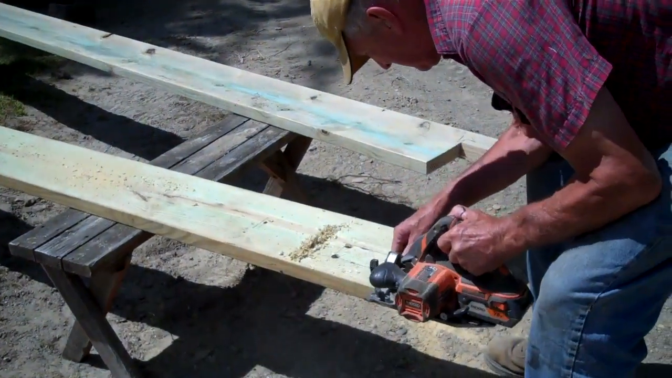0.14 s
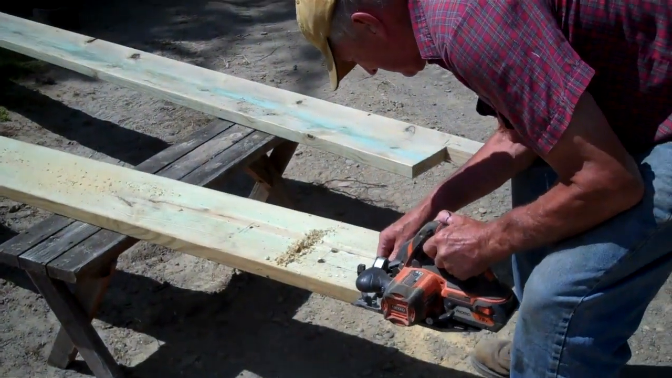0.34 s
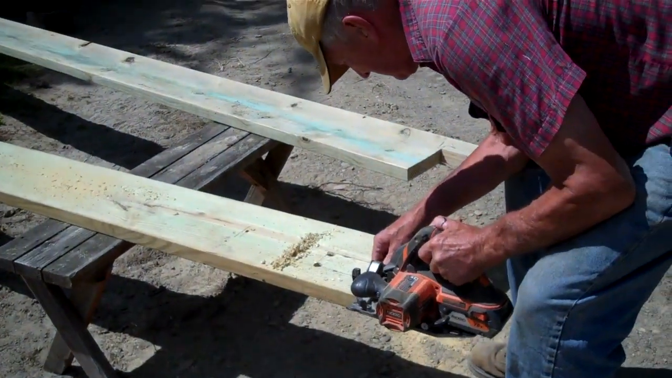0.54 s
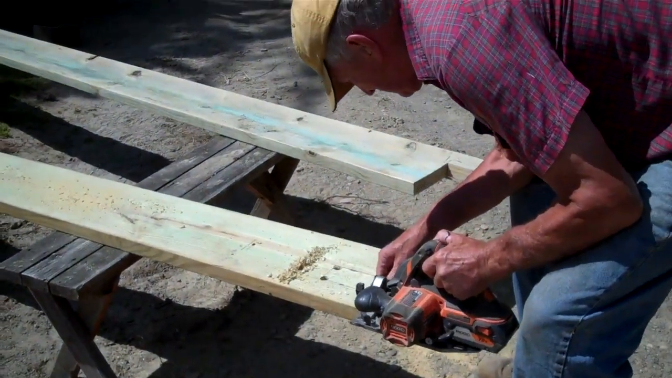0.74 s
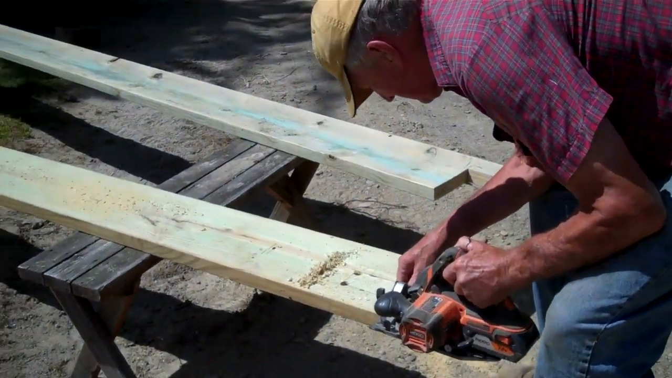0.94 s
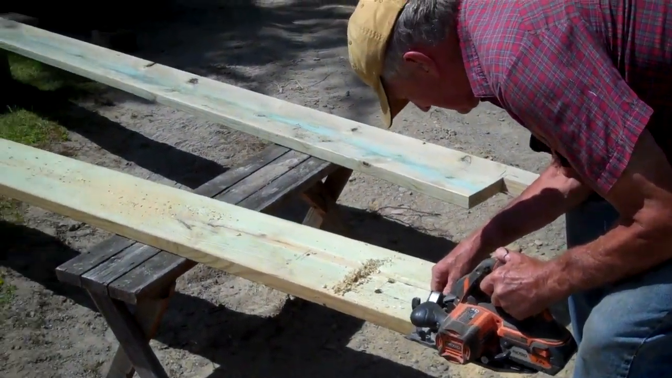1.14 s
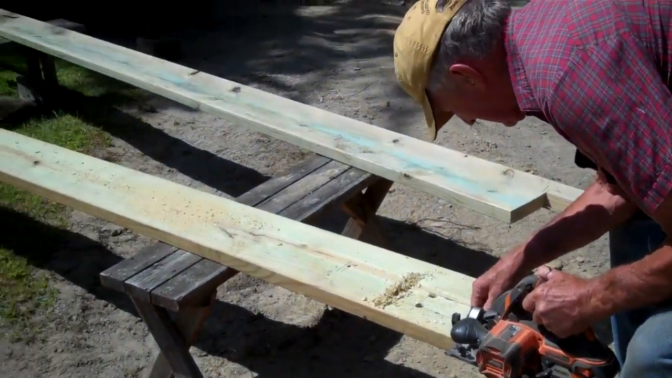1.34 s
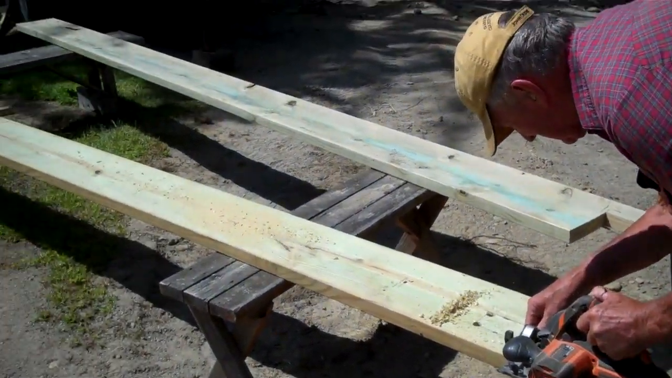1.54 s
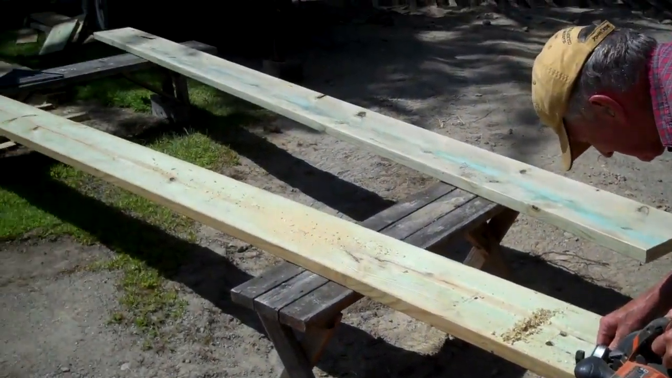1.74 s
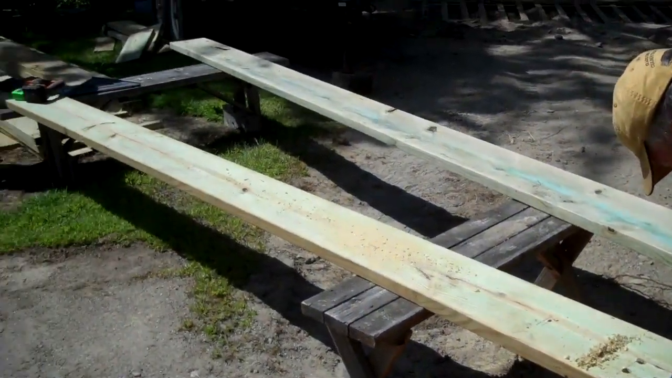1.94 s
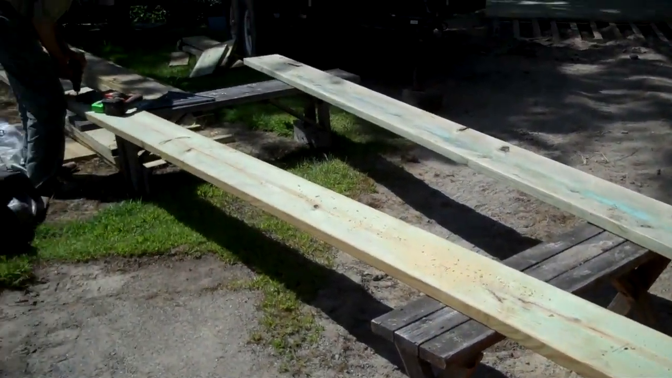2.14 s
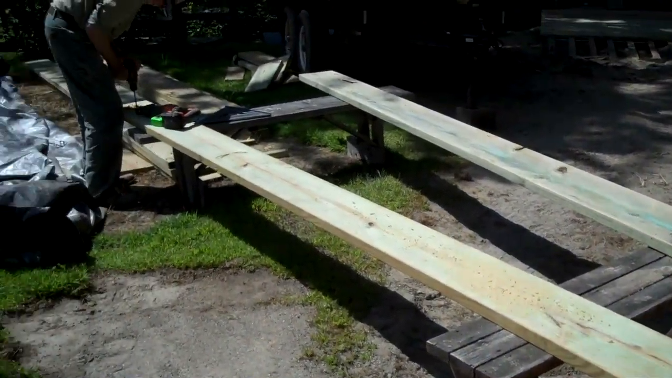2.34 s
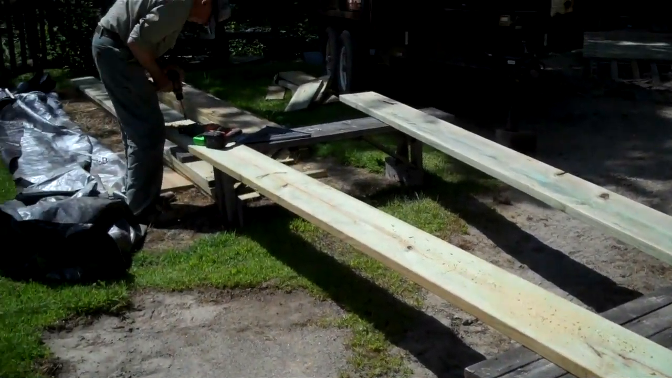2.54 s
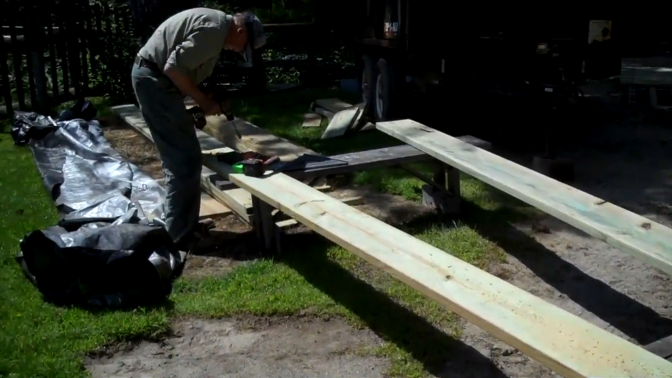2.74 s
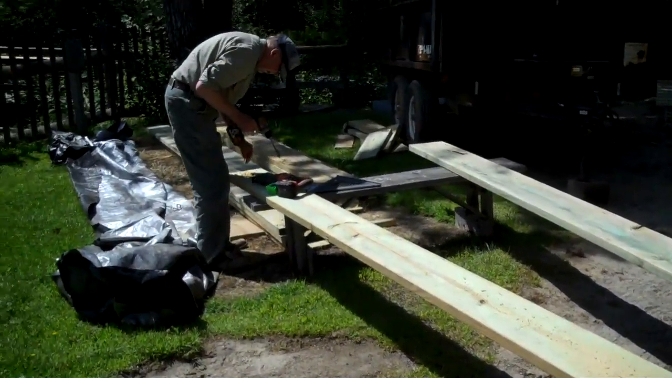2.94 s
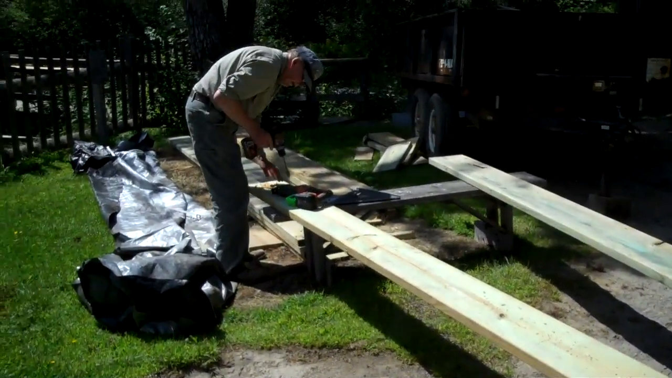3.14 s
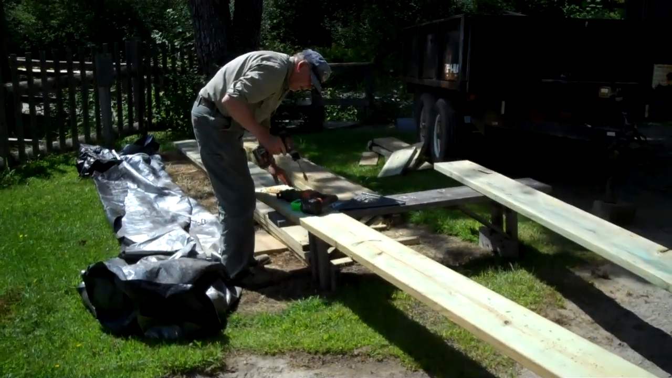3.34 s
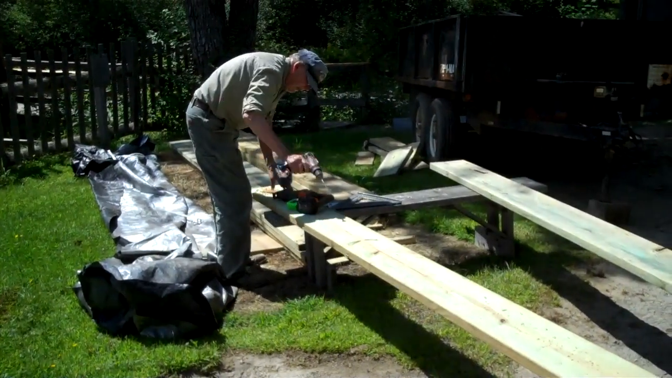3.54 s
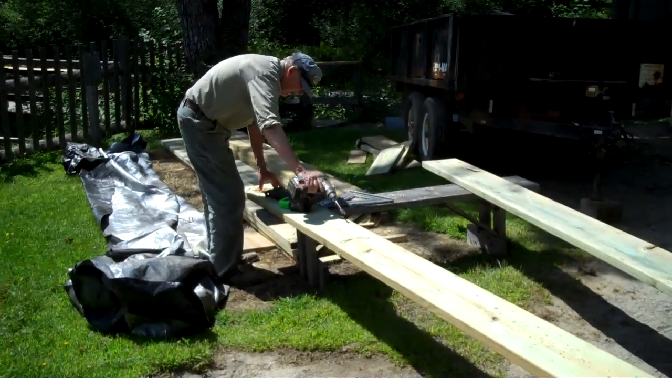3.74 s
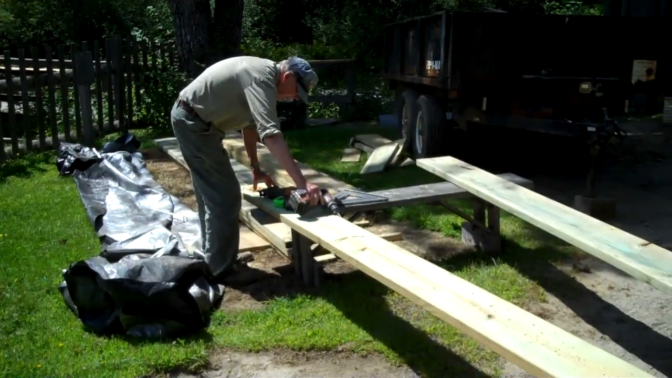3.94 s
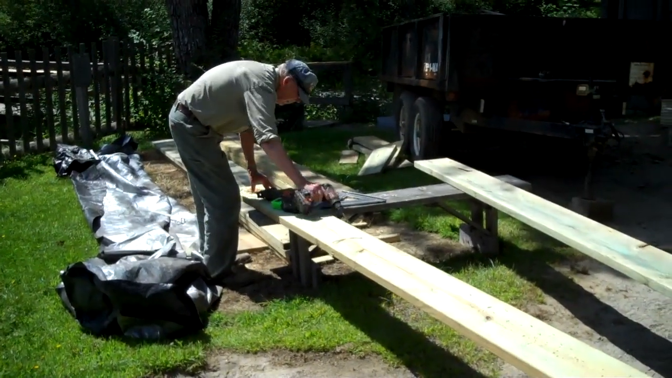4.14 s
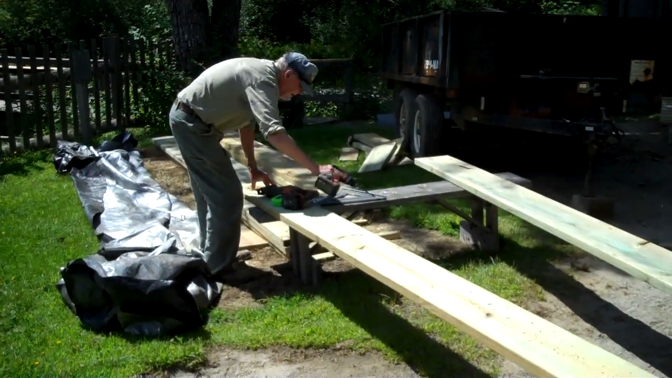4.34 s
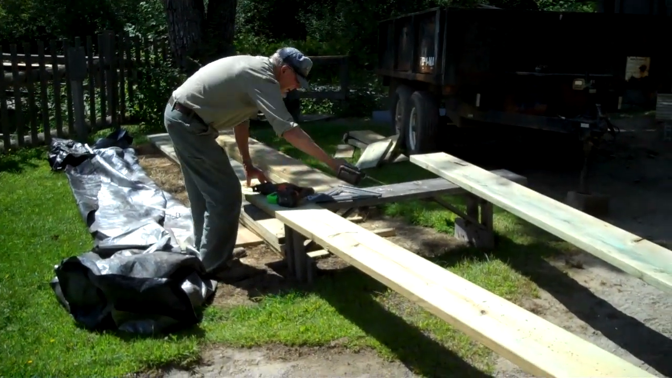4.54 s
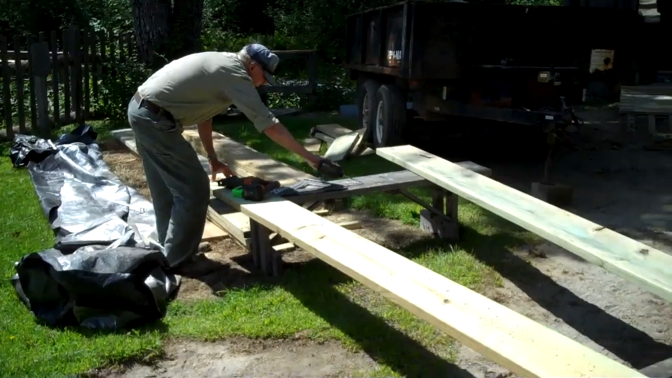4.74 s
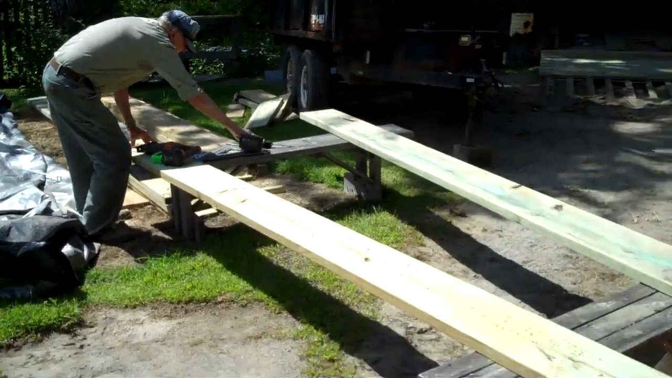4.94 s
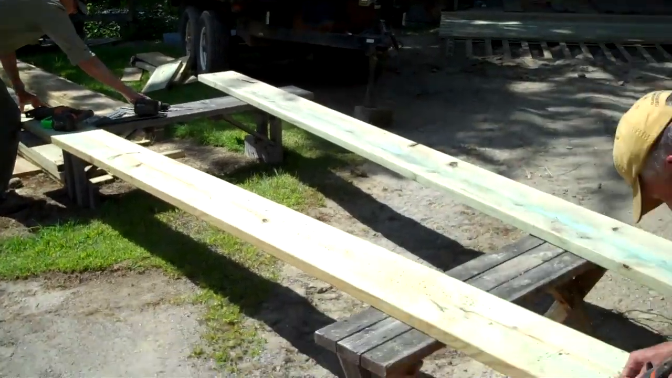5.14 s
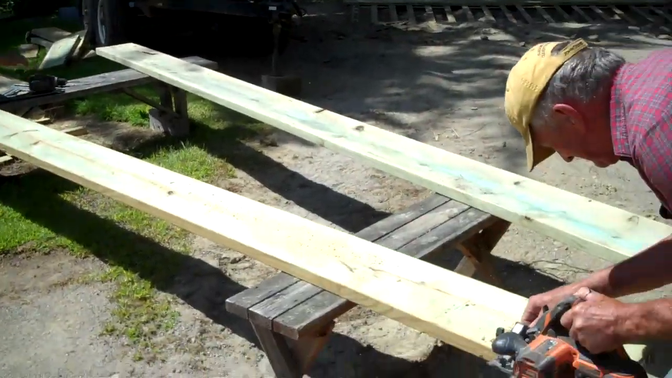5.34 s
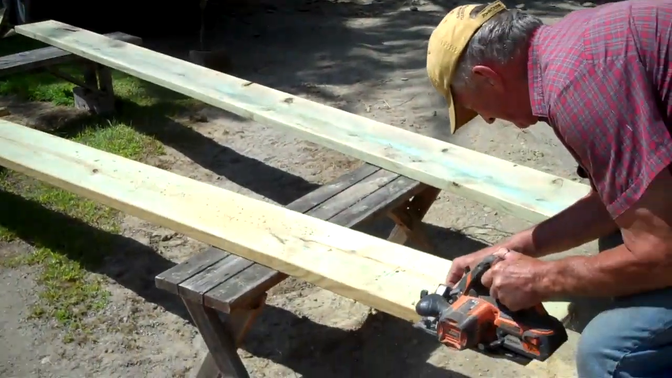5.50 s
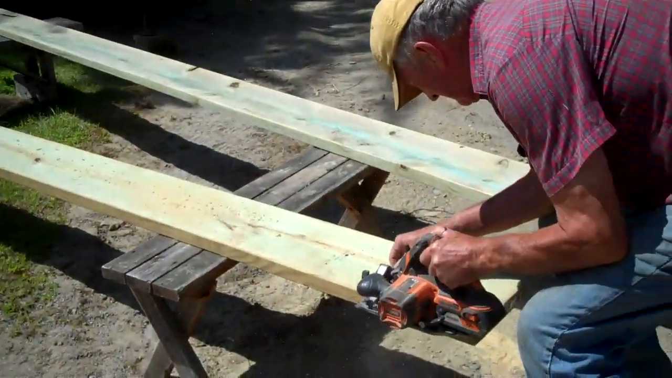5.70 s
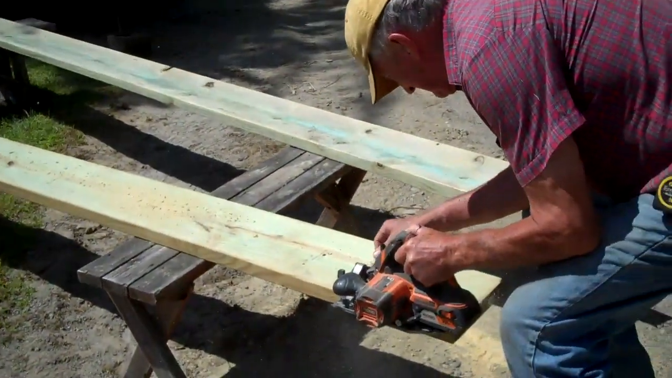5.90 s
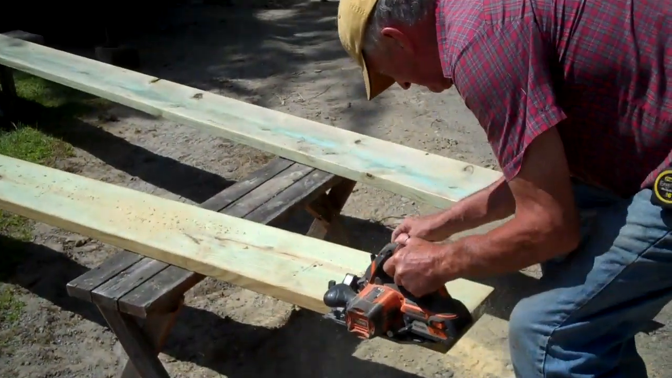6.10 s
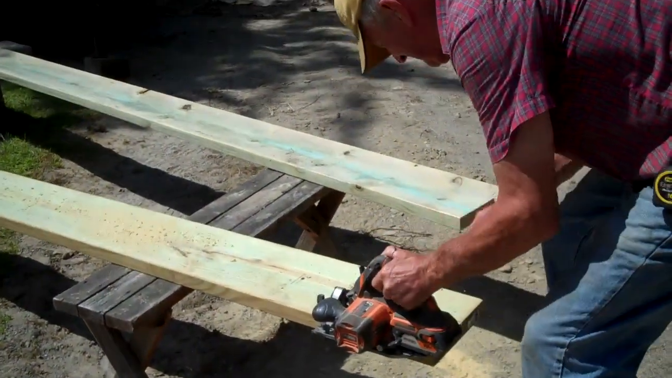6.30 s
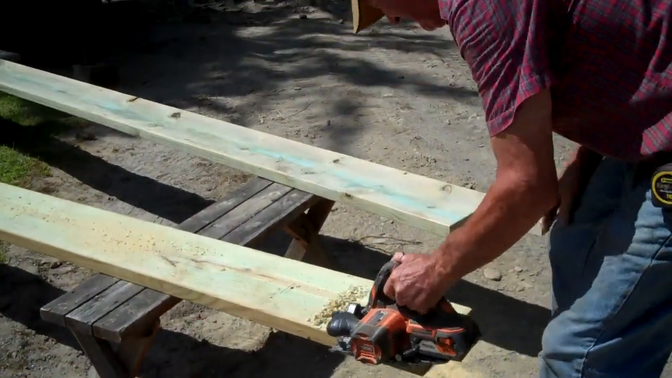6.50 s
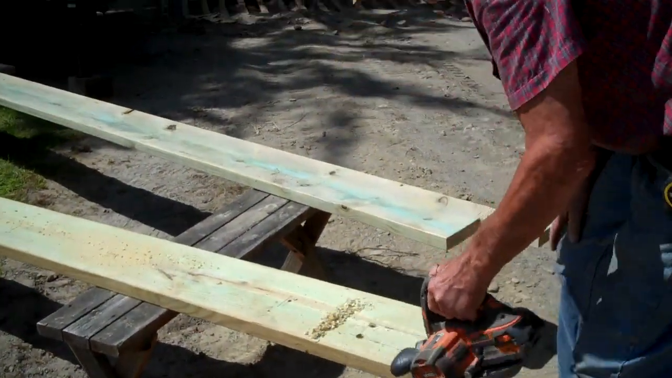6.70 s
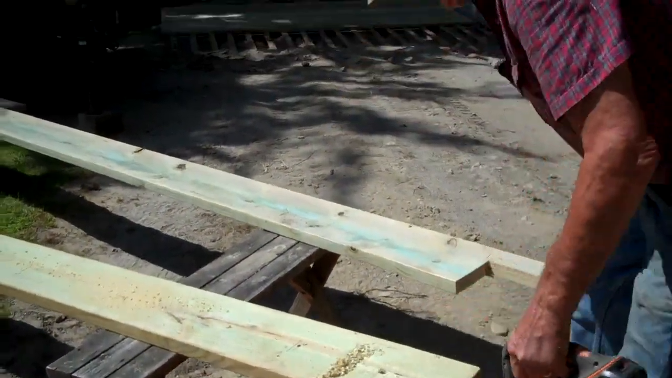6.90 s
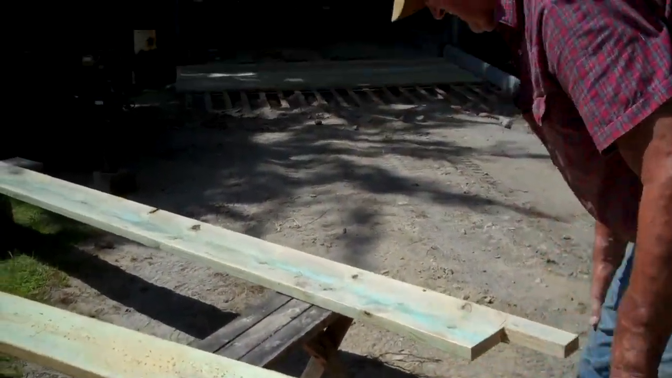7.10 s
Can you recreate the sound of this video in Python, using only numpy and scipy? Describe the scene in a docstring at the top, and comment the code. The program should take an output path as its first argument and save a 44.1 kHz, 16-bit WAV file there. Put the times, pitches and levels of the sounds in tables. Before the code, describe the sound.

A cordless planer snaps on and shaves a board with a hissing, rasping cut and whine, then stops, while another tool hisses farther off.

```python
"""In a yard, a power tool works a plank some way off to the left. Close on the right a cordless planer
snaps on, spins up and shaves a board. Its knives hiss and rasp as they tear off chips, its fan and belt
whine sink as the load grows and rise as it eases, and its sole (the metal base) squeals as it rubs.
It is lifted and stops, then the sole slides off the end of the board."""
import sys
import numpy as np
from scipy import signal
from scipy.fft import rfft, irfft
from scipy.io import wavfile
from scipy.ndimage import uniform_filter1d, map_coordinates

SR = 44100
rng = np.random.default_rng(int(sys.argv[2]) if len(sys.argv) > 2 else 0)


def dump(signal):
    """Clip the signal to [-1, 1] and save it as 16-bit WAV at the path in sys.argv[1]."""
    limited = np.clip(np.atleast_2d(signal).T, -1, 1)
    pcm = np.round(limited * 32767).astype(np.int16)
    wavfile.write(sys.argv[1], SR, pcm)


N = 315756
T = np.arange(N) / SR
HZ = np.maximum(np.arange(N // 2 + 1) * SR / N, 1)

# how loud the cut is: t/s, level/dB, extra for the hiss/dB, extra for the chip spray/dB
CUT_LEVELS = [(1.8, -24.5, 3.5, -9), (2.45, -23.5, 1, -11.5), (2.8, -22, 2.5, -5), (3.4, -24, 5.5, 1.5),
              (4.55, -24.5, 2, 1), (4.85, -26, 4.5, 5), (5.15, -22, 6, -5), (5.6, -25, 6.5, -3),
              (5.9, -26, 9, -2.5), (6.12, -26, 4.5, -18), (6.3, -31, 8, -7)]
# moments when the knives bite deeper: t/s, length/s, boost/dB
DEEP_BITES = [(1.46, 0.037, 7), (1.61, 0.16, 2.5), (1.73, 0.089, 7.5), (2.06, 0.16, 4.5), (2.19, 0.082, 3),
              (2.36, 0.065, 5), (2.63, 0.18, 5.5), (5.77, 0.063, 2), (6.02, 0.065, 7.5), (6.18, 0.061, 8.5)]
# tone colours of the cut's four layers, from low to high: f/Hz, level/dB
BOARD_COLOUR = [(30, -40), (90, -33.5), (200, -20), (380, -11), (520, 8), (660, 12.5), (780, 5), (1050, 12),
                (1350, 6), (1700, -45)]
RASP_COLOUR = [(1100, -82), (1400, 1.5), (1600, -1), (1900, -0.5), (2400, 4), (2850, 5), (3400, 0.5),
               (4000, 0), (4650, 4.5), (5500, -10.5)]
HISS_COLOUR = [(4000, -66), (4750, -4), (5300, 3.5), (5800, 3.5), (6300, 7.5), (6900, 7.5), (7400, 9.5),
               (8000, 3), (8700, -1.5), (10000, -85)]
SPRAY_COLOUR = [(7800, -32), (8900, 0), (10000, -10), (11500, -10.5), (12800, -14.5), (14300, -13)]
# how each of those layers reacts: share of a bite, exponent on the spin, share of the flutter
LAYER_RESPONSE = [(0.38, 0.1, .5), (0.85, 1.0, 0.25), (1.0, 4.3, 0.56), (1, 3.8, 1)]
# how alike a tool's noise is on the left and right: f/Hz, likeness (1 = the same)
TOOL_LIKENESS = [(60, 0.34), (300, 0.87), (1200, 1), (3500, 0.95), (6500, 0.85), (9000, 0.53),
                 (13000, 0.11)]
def knives(speed, chip_db=1.3, pulse_depth=.25, grain_db=1.5, flutter_db=1.64, lift_s=6.3):
    """Each knife pass tears a chip of its own size; deep bites swell the cut, the grain flutters it."""
    turns = np.cumsum(speed) / SR
    chip_size = rng.standard_normal(N)[turns.astype(int)]
    passes = from_db(chip_db * chip_size) * (1 + pulse_depth * np.cos(2 * np.pi * turns))
    feed_db, hiss_db, spray_db = in_time(CUT_LEVELS)
    feed_db = feed_db - 188 * np.maximum(T - lift_s, 0)   # the cut dies as the planer is lifted
    board_db = -14 + .0885 * (in_time(SHAFT_SPEED)[0] - 200)   # the board drums harder at speed
    bite_db, spun, flutter, out = swells(DEEP_BITES), spin(), drift(32), 0
    layers = (board_db, BOARD_COLOUR), (0, RASP_COLOUR), (hiss_db, HISS_COLOUR), (spray_db, SPRAY_COLOUR)
    for (layer_db, colour), (bite_share, exponent, flutter_share) in zip(layers, LAYER_RESPONSE):
        tearing = rms_one(passes * from_db(grain_db * drift(910)))
        wander_db = flutter_db * (flutter_share * flutter + .5 * drift(7.9))
        gain = spun ** exponent * from_db(feed_db + layer_db + bite_share * bite_db + wander_db)
        out = out + gain * tearing * noise(colour, TOOL_LIKENESS)
    bass_cut = signal.butter(2, 190, "high", fs=SR, output="sos")
    return signal.sosfilt(bass_cut, out)   # keeps deep rumble out of the cutting noise


# how fast the load lets the planer's shaft turn: t/s, speed/(turns per s)
SHAFT_SPEED = [(1.9, 255), (2.12, 251), (2.42, 275), (2.57, 280), (2.98, 266), (3.25, 241), (3.53, 206),
               (3.7, 197.5), (3.9, 209.5), (4.07, 198.5), (4.3, 203.5), (4.6, 198), (5.15, 167), (5.3, 164),
               (5.58, 163.5), (5.75, 182), (5.92, 190), (6.05, 220), (6.23, 245)]
def shaft_speed(wobble=.00227):
    """Turns per second, from start to stop: the shaft slows under load and wobbles a little."""
    return in_time(SHAFT_SPEED)[0] * spin() * (1 + wobble * drift(52.4))


SWITCH_ON_S, SWITCH_OFF_S = 1.355, 6.24
def spin(spin_up_s=.28, braking_s=.21):
    """Share of working speed, 0 to 1: the shaft speeds up at nearly steady power and brakes evenly."""
    rising = np.clip((T - SWITCH_ON_S) / spin_up_s, 0, 1) ** .42
    return rising * np.clip(1 - (T - SWITCH_OFF_S) / braking_s, 0, 1)


# tones of the motor, cutter and six-bladed fan: multiple of the shaft speed, level/dB
MOTOR_TONES = [(3, -13), (3.5, -15), (4, -15), (4.5, -16), (5, -19), (5.5, -19), (6, -4.5), (7, -9),
               (8, -10), (9, -10), (10, -10), (11, -11), (12, -10)]
# the low hum, the whistle and the high singing: multiple of the shaft speed, level/dB
HUM_TONES = [(1, -21), (1.25, -19), (1.5, -19), (2, -24)]
WHISTLE_TONES = [(18.5, -5.5), (27.75, -3), (30, 1), (36.25, -8)]
SINGING_TONES = [(12, -7), (15, -8), (30, 0)]
# pitches at which the planer's case rings and lifts a tone: f/Hz, width/Hz, boost/dB
CASE_RINGS = [(264.6, 37, 10.5), (610, 23, 5), (1020, 510, 8), (1220, 120, 2), (4400, 530, 2.5),
              (5260, 1900, 17), (6330, 670, 7.5)]
# brief swells and dips of the motor's drone: t/s, length/s, change/dB
DRONE_SWELLS = [(2.2, 0.34, -8), (3.55, 0.21, 1), (5.42, 0.19, -9), (5.72, 0.1, 1.5), (6.05, 0.46, -2.5)]
def motor(speed):
    """Motor and fan drone, whistle under the first light load and sing when they turn fastest."""
    running = spin() ** 4
    drone_gain = running * from_db(-38 + swells(DRONE_SWELLS))
    drone = drone_gain * tones(speed, MOTOR_TONES, waver_db=2.8, rings=CASE_RINGS)
    hum_gain = running * held(SWITCH_ON_S, 5.54, fade_s=.6) * from_db(-42)
    hum = hum_gain * tones(speed, HUM_TONES, waver_db=2, rings=CASE_RINGS)   # the shaft is unbalanced
    shaky_speed = speed * (1 + .007 * drift(160))
    whistle_gain = held(1.6, 2.12, fade_s=.05) * from_db(-23.5)
    whistle = whistle_gain * tones(shaky_speed, WHISTLE_TONES, waver_db=2.8)
    singing_gain = running * from_db(-25.5 - .3 * (270 - speed))   # fades as the shaft slows
    singing = singing_gain * tones(shaky_speed, SINGING_TONES, waver_db=2.8)
    return drone + hum + whistle + singing


# tones of the toothed belt: multiple of the rate at which teeth pass, level/dB
BELT_TONES = [(2, -10), (3, -15), (4, -15), (5, -22)]
# brief swells and dips of its whine: t/s, length/s, change/dB
WHINE_SWELLS = [(3.9, 0.18, 5.5), (4.98, 0.25, -6), (5.47, 0.43, 4), (5.82, 0.26, -6), (6.15, 0.043, 9),
                (6.25, .08, -8)]
def belt(speed, teeth_per_turn=10.75, slack_speed=254):
    """The belt slips and screeches at the start, whines when pulled tight and flaps as speed changes."""
    smooth_speed = uniform_filter1d(speed, SR // 10)
    surge = np.clip(abs(np.gradient(smooth_speed)) * SR / 500, 0, 1)   # how quickly the speed changes
    tooth_hz = speed * teeth_per_turn * (1 + (.002 + .026 * surge) * drift(400))
    roughness = np.clip(.26 + .91 * surge, 0, .6)
    flapping = np.sqrt(1 - roughness ** 2) + roughness * drift(570)
    tension = spin() ** 4 * np.clip((slack_speed - speed) / 50, 0, 1)   # grows as load slows the shaft
    whine_gain = tension * from_db(-28 + swells(WHINE_SWELLS))
    screech_gain = held(1.4, 1.615, fade_s=.066) * from_db(-21.5)
    teeth = tones(tooth_hz, BELT_TONES, waver_db=1.6, rings=CASE_RINGS)
    return np.maximum(whine_gain, screech_gain) * flapping * teeth


# the stopped planer slides off the board and drops: t/s, rise/s, fall/s, board/dB, rasp/dB, hiss/dB
SOLE_SLIDES = [(6.72, 0.059, 0.061, -42, -34, -34), (6.787, 0.014, 0.017, -29, -36, -39)]
def sole_slide(judder_db=2.5):
    """The sole judders over the wood, which sounds with the tone colours of the cut."""
    out = 0
    for layer, colour in enumerate((BOARD_COLOUR, RASP_COLOUR, HISS_COLOUR)):
        gain = sum(from_db(db[layer]) * stroke(t, rise, fall) for t, rise, fall, *db in SOLE_SLIDES)
        out = out + gain * noise(colour, TOOL_LIKENESS)
    return out * rms_one(from_db(judder_db * drift(110)))


# squeals of the rubbing sole: t/s, rise/s, fall/s, level/dB
SOLE_SQUEALS = [(5.05, .08, 0.19, -20), (5.82, 0.16, .1, -18), (6.02, 0.056, .05, -20),
                (6.19, .07, 0.06, -19), (6.668, .012, .018, -27.5), (6.704, 0.0033, .025, -21)]
def sole_squeal(pitch_hz=6190, width_hz=150, burst_db=2):
    """The metal sole sticks and slips, which makes it ring at one high pitch in short bursts."""
    ringing = rms_one(irfft(rfft(rng.standard_normal(N)) * resonance(pitch_hz, width_hz), N))
    rubbing = sum(from_db(db) * stroke(t, rise, fall) for t, rise, fall, db in SOLE_SQUEALS)
    return rubbing * rms_one(ringing * from_db(burst_db * drift(60)))


# the switch snaps, then knocks (duller on wood): t/s, level/dB, time to fade by 60 dB/s, treble limit/Hz
CONTACTS = [(1.352, -10, 0.014, 14000), (1.3538, 0, 0.016, 14000), (1.355, -8, 0.056, 12000),
            (1.629, -26, 0.017, 12100), (6.174, -16, 0.027, 6000), (6.282, -15, 0.033, 2543),
            (6.701, -33, 0.035, 12000), (6.73, -16.5, 0.052, 3000)]
# pitches at which the planer rings when struck: f/Hz, width/Hz, level/dB
BODY_RINGS = [(170, 170, 0), (920, 1000, -9), (2400, 380, 23), (5380, 920, 21), (7050, 120, 19.5)]
def knocks():
    """Each contact is a brief rattle that sets the planer's body ringing."""
    rattle, force = rng.standard_normal(N), 0
    for t, db, fade_s, treble_hz in CONTACTS:
        blow = rattle * from_db(db - 60 * np.clip((T - t) / fade_s, 0, 2)) * (T >= t)
        force = force + signal.sosfilt(signal.butter(2, treble_hz, fs=SR, output="sos"), blow)
    body = sum(from_db(db) / np.sqrt(width) * resonance(hz, width) for hz, width, db in BODY_RINGS)
    return irfft(rfft(force) * body / np.sqrt(np.mean(abs(body) ** 2)), N)


# how loud the far tool is: t/s, wood rumble/dB, hiss/dB
FAR_LEVELS = [(0, -36.5, -23.5), (0.66, -36.5, -21), (0.82, -41.5, -23), (0.92, -29, -24), (1.3, -27, -24),
              (2.6, -53, -21.5), (5, -36, -15.5), (6.3, -65, -34.5)]
# tone colours of that rumble and hiss: f/Hz, level/dB
FAR_WOOD_COLOUR = [(30, -46), (90, -29), (250, -13.5), (400, -13), (600, 4.5), (800, 3), (1150, 12),
                   (1350, -4), (1700, -4)]
FAR_HISS_COLOUR = [(1100, -43.5), (1450, -20), (2200, -17), (2900, -10.5), (3400, -15), (4050, -10),
                   (4400, -13.5), (4700, -8.5), (5150, -12), (5800, -5.5), (7600, 0), (8800, -12.5),
                   (10000, -14), (12000, -20.5), (14300, -30)]
# how often its fan blades pass: t/s, f/Hz
FAR_BLADE_RATE = [(0, 1785), (.25, 1865), (.48, 2020), (.7, 1916), (.85, 1950), (.97, 1850), (1.12, 1975),
                  (1.35, 1930)]
# tones of its fan: multiple of the blade rate, level/dB
FAR_FAN_TONES = [(1, -6), (2, 1), (3, 3), (4, 7), (5, 0)]
# pitches at which its case rings: f/Hz, width/Hz, boost/dB
FAR_CASE_RINGS = [(4080, 140, 9.5), (5860, 190, 13.5)]
def far_tool(rumble_db=3, flutter_db=1.02, whistle_hz=4100):
    """The far tool's plank rumbles and its cut hisses; early on come a fan whine and a brief whistle."""
    wood_db, hiss_db = in_time(FAR_LEVELS)
    wood = from_db(wood_db + rumble_db * drift(25)) * noise(FAR_WOOD_COLOUR, TOOL_LIKENESS)
    hiss = from_db(hiss_db + flutter_db * drift(17)) * noise(FAR_HISS_COLOUR, TOOL_LIKENESS)
    wobble = 1 + .00396 * drift(56)
    blade_hz = in_time(FAR_BLADE_RATE)[0] * wobble
    fan = from_db(-44) * tones(blade_hz, FAR_FAN_TONES, waver_db=3, rings=FAR_CASE_RINGS)
    whistle = from_db(-39.5) * tones(whistle_hz * wobble, [(1, 0)], waver_db=2)
    return wood + hiss + held(0, 1.63, fade_s=.13) * fan + held(1.07, 1.5, fade_s=.04) * whistle


# background hiss, which dips after the loud cut and swells back as the microphone's gain recovers:
# t/s, level/dB
BACKGROUND_LEVEL = [(0, -37), (6.38, -42), (6.6, -34.5), (6.9, -38), (7.15, -38)]
# its tone colour: f/Hz, level/dB
BACKGROUND_COLOUR = [(45, -18), (130, -13.5), (260, -8.5), (400, -11), (600, -2.5), (1100, -4), (2000, -5),
                     (3200, -13.5), (5500, -14), (6400, -9.5), (7000, 4.5), (8000, -5), (10000, -29.5),
                     (14000, -35)]
# how alike it is on the left and right: f/Hz, likeness (1 = the same)
BACKGROUND_LIKENESS = [(40, 0.27), (150, 0.91), (600, 0.98), (1500, 0.62), (3000, 0.12), (6000, 0.13),
                       (9000, .1)]
def background(hum_hz=63, hum_db=-69.5):
    """A soft hiss from all around and a faint, wavering hum."""
    hum = np.sqrt(2) * from_db(hum_db) * np.sin(2 * np.pi * hum_hz * T + drift(4))
    return hum + from_db(in_time(BACKGROUND_LEVEL)[0]) * noise(BACKGROUND_COLOUR, BACKGROUND_LIKENESS)


def tones(rate, multiples, waver_db, rings=()):
    """Tones that follow a turning part; each wavers, and swells near a pitch where the case rings."""
    angle, out = 2 * np.pi * np.cumsum(rate) / SR, 0
    for multiple, db in multiples:
        boost_db = sum(top / (1 + (2 * (multiple * rate - hz) / width) ** 2) for hz, width, top in rings)
        gain = from_db(db + boost_db + waver_db * drift(14))
        out = out + np.sqrt(2) * gain * np.sin(multiple * angle + 2 * np.pi * rng.random())
    return out


def noise(colour, likeness):
    """Stereo noise of strength 1 with a given tone colour, partly shared by left and right."""
    alike = np.clip(over_hz(likeness), 0, 1)
    shared, *own = rfft(rng.standard_normal((3, N)))
    blend = np.sqrt(alike) * shared + np.sqrt(1 - alike) * np.array(own)
    return rms_one(irfft(from_db(over_hz(colour)) * blend, N))


def drift(rate_hz):
    """A random wander about 1 in size, mostly slower than the given rate, with no wild peaks."""
    wander = irfft(rfft(rng.standard_normal(N)) / (1 + (HZ / rate_hz) ** 2), N)
    return np.clip(rms_one(wander), -2.5, 2.5)


def resonance(hz, width):
    """How something that rings at one pitch answers each frequency; 1 at that pitch."""
    return 1 / (1 + 1j * (HZ * HZ - hz * hz) / (HZ * width))


def swells(rows):
    """Bell-shaped rises or dips of level, in dB."""
    return sum(db * np.exp(-np.log(2) * (2 * (T - t) / length) ** 2) for t, length, db in rows)


def stroke(peak_s, rise_s, fall_s):
    """A gain that grows up to a moment and dies away after it."""
    return np.exp(-np.maximum((peak_s - T) / rise_s, (T - peak_s) / fall_s))


def held(start_s, end_s, fade_s):
    """A gain that fades in, holds and fades out."""
    return np.clip(.5 + np.minimum(T - start_s, end_s - T) / fade_s, 0, 1)


def in_time(rows):
    """Join a table's points over time, giving one curve for each column after the first."""
    times, *columns = np.transpose(rows)
    return [np.interp(T, times, column) for column in columns]


def over_hz(points):
    """Join a table's points into a curve over frequency."""
    hz, value = np.transpose(points)
    return np.interp(np.log(HZ), np.log(hz), value)


def from_db(db):
    """Turn decibels into a gain, the number a signal is multiplied by."""
    return 10 ** (np.asarray(db) / 20)


def rms_one(x):
    """Scale a signal so that its average strength (rms) is 1."""
    return x / np.sqrt(np.mean(x ** 2) + 1e-20)


def placed(stereo, right_lead_ms):
    """Shift the left side in time, so that the side nearer the source hears it first."""
    positions = np.arange(N) - right_lead_ms * SR / 1000
    return np.array([map_coordinates(stereo[0], [positions], order=3, mode="nearest"), stereo[1]])


# the planer's direction: t/s, head start of the right side/ms
PLANER_LEAD = [(1.4, 0.056), (2.2, 0.084), (3.0, 0.093), (4.6, 0.1), (5.3, 0.072), (5.8, 0.027),
               (6.8, 0.019)]
def scene():
    """The planer on the right, the far tool on the left, the background all around."""
    speed = shaft_speed()
    planer = knives(speed) + motor(speed) + belt(speed) + sole_slide() + sole_squeal() + knocks()
    tools = placed(planer, in_time(PLANER_LEAD)[0]) + placed(far_tool(), right_lead_ms=-.038)
    return tools + background()


# how the right side colours the sound: f/Hz, level/dB
RIGHT_COLOUR = [(100, 0), (3800, 0), (5000, 2), (5900, 5), (6400, 1), (7100, -12.5), (7800, -13),
                (10000, -10), (12000, -17.5), (14300, -24.5)]
def record(dry, cutoff_hz=14300):
    """The right side rings near 6 kHz and is dull above; loud peaks clip; the top treble is cut."""
    # build a minimum-phase filter: one that rings only after a sound, never before it
    cepstrum = irfft(np.log(from_db(over_hz(RIGHT_COLOUR))), N)
    one_sided = np.where(T < T[N // 2], 1 + (T > 0), 0)
    right_filter = np.exp(rfft(cepstrum * one_sided))
    right = irfft(rfft(dry[1]) * right_filter, N)
    clipped = np.clip([dry[0], right], -1, 1)
    return signal.sosfilt(signal.ellip(12, .1, 80, cutoff_hz, fs=SR, output="sos"), clipped)


dry = scene()
out = record(dry)
dump(out)
```